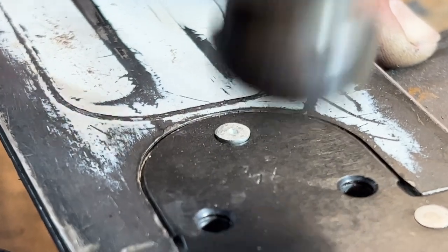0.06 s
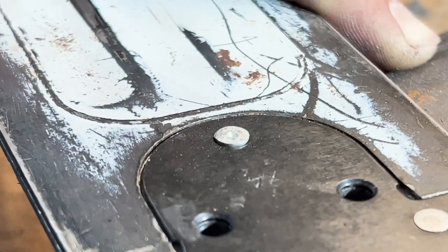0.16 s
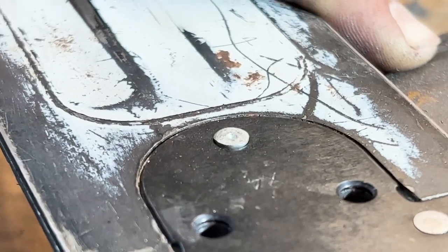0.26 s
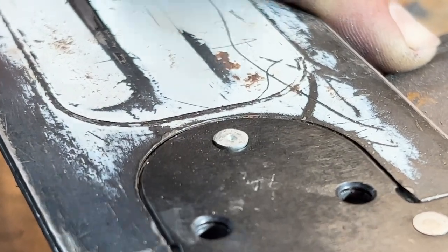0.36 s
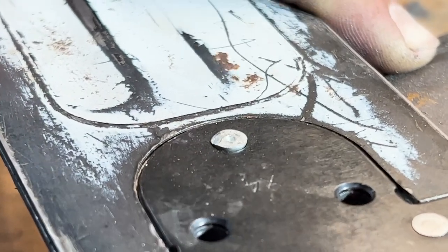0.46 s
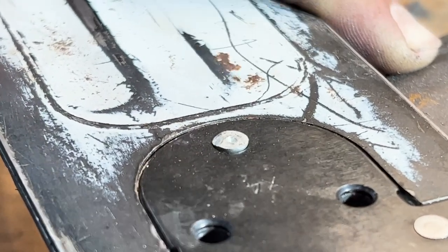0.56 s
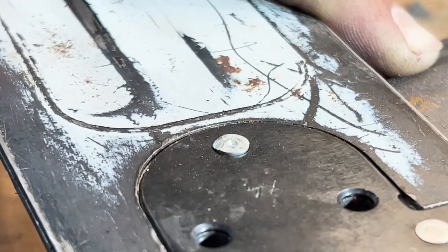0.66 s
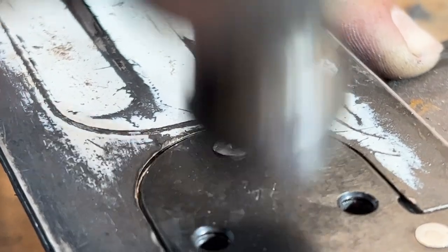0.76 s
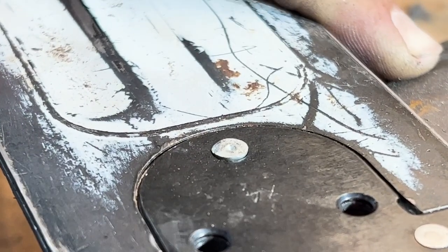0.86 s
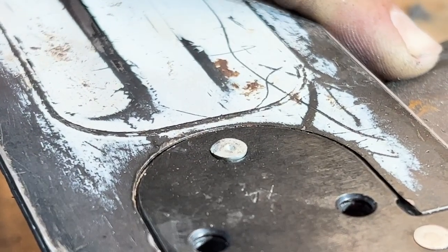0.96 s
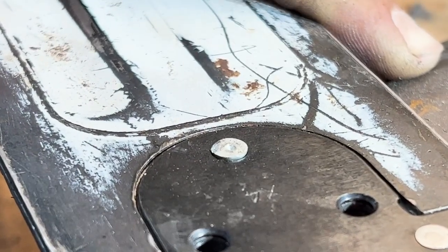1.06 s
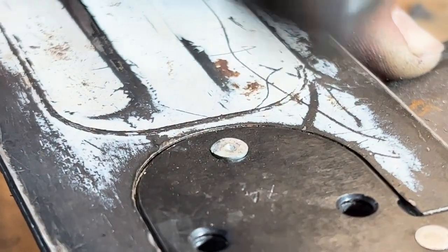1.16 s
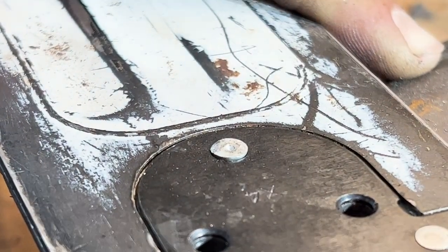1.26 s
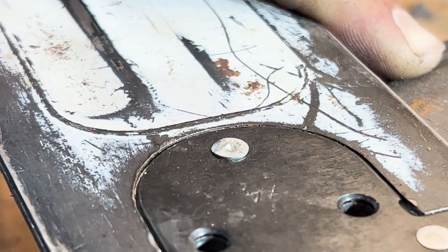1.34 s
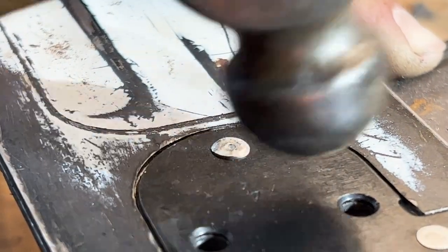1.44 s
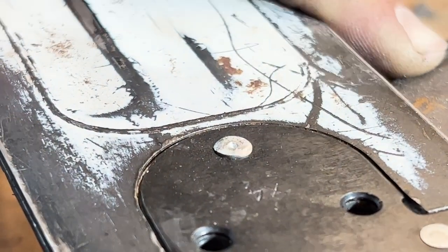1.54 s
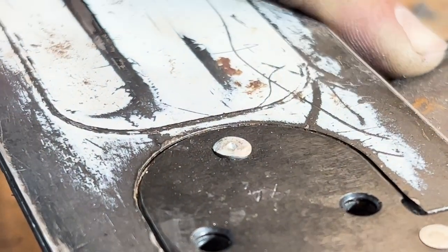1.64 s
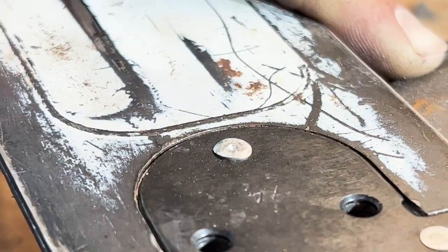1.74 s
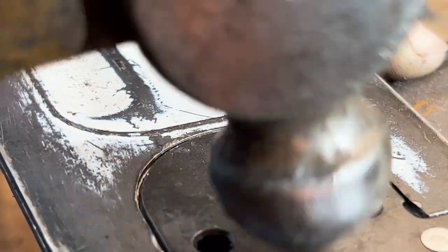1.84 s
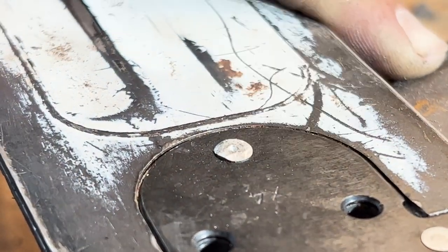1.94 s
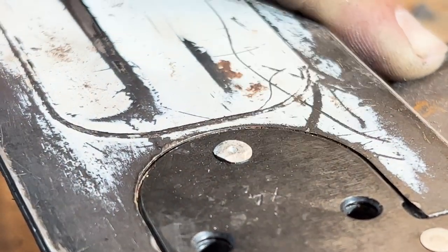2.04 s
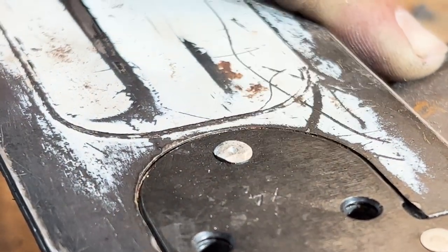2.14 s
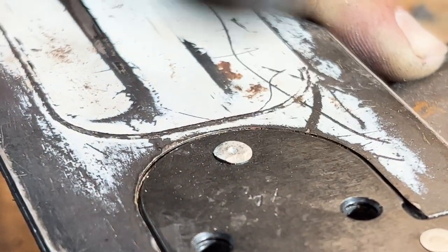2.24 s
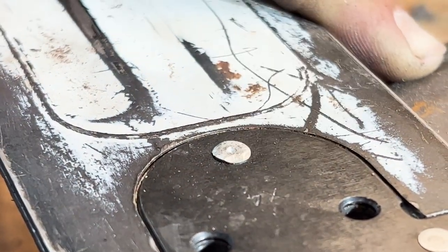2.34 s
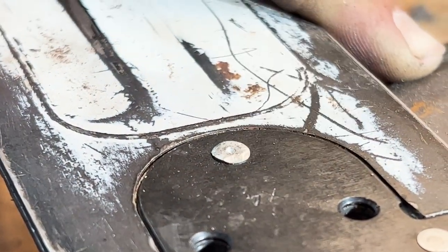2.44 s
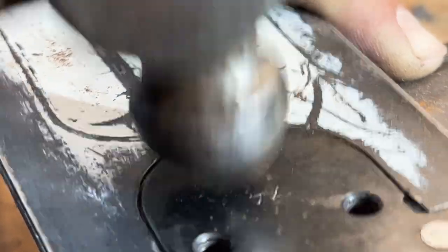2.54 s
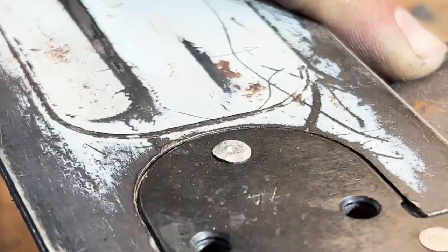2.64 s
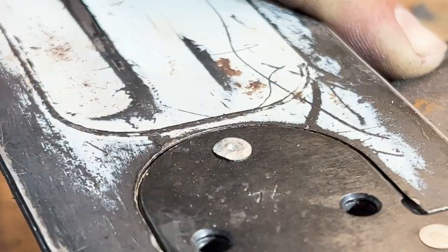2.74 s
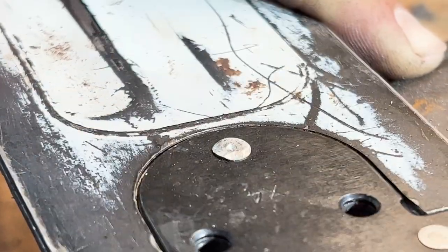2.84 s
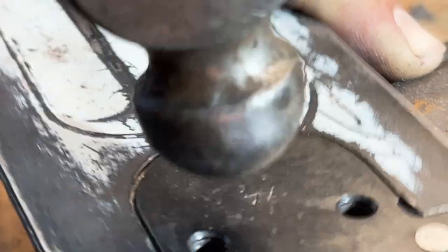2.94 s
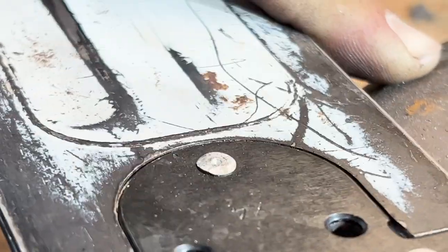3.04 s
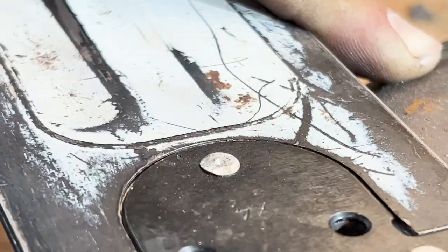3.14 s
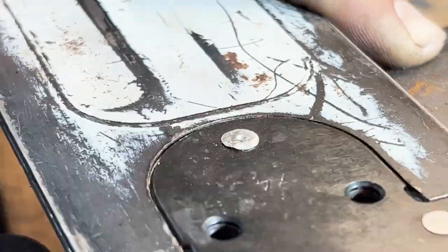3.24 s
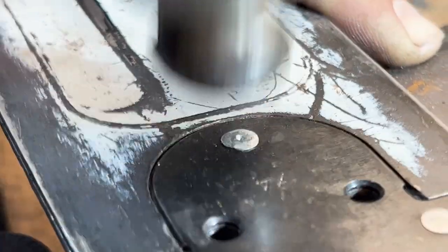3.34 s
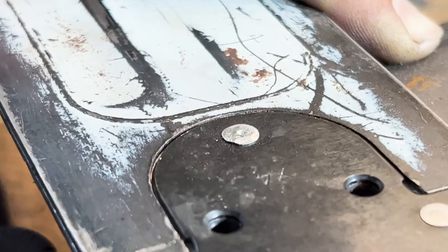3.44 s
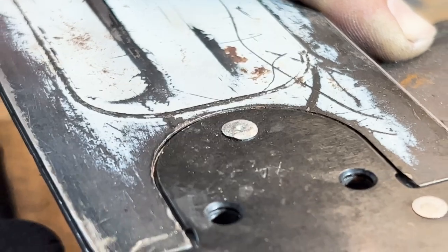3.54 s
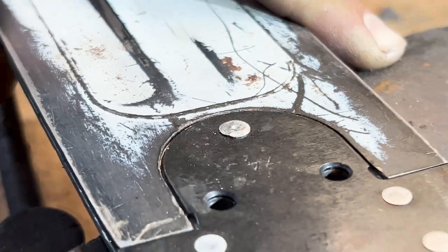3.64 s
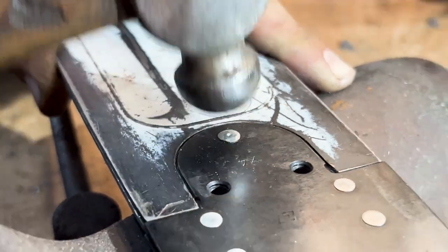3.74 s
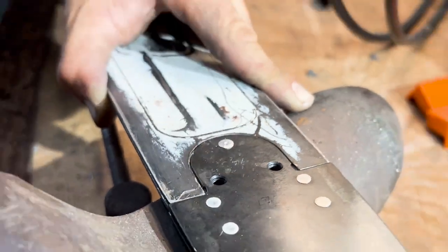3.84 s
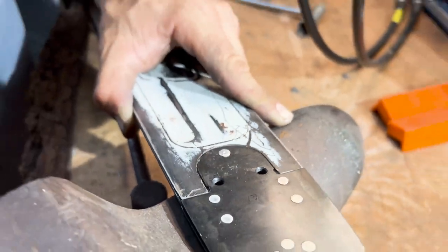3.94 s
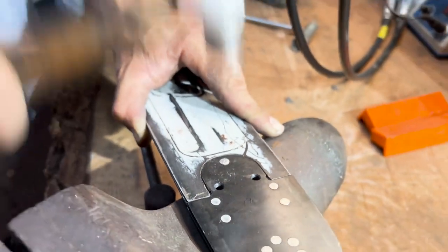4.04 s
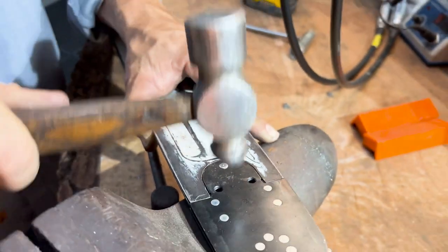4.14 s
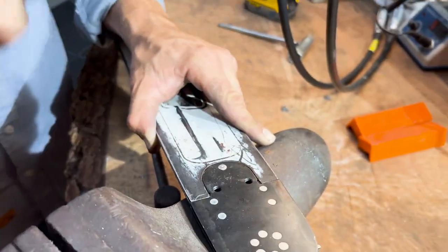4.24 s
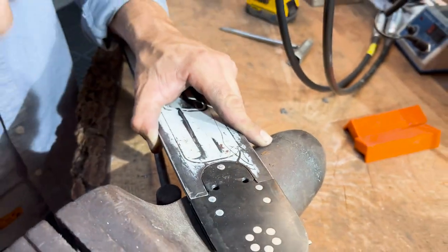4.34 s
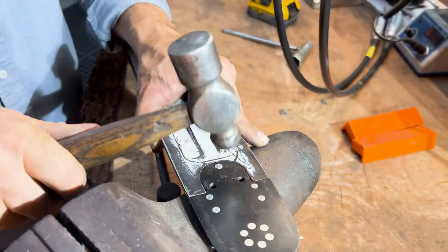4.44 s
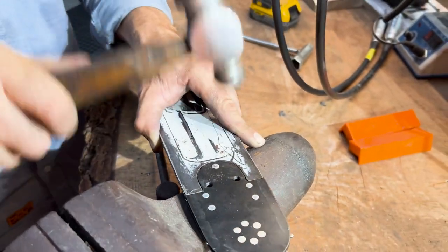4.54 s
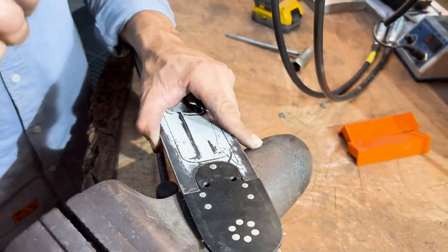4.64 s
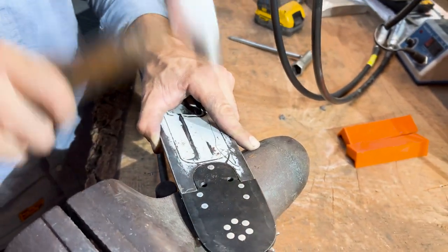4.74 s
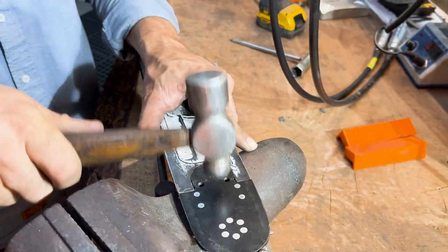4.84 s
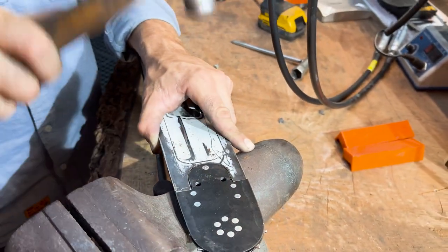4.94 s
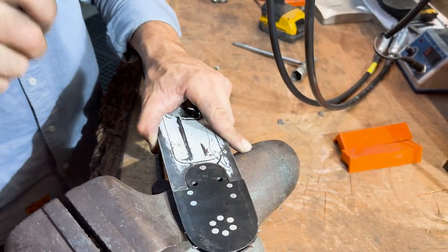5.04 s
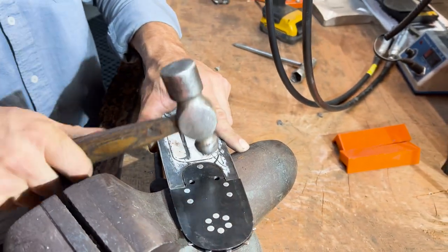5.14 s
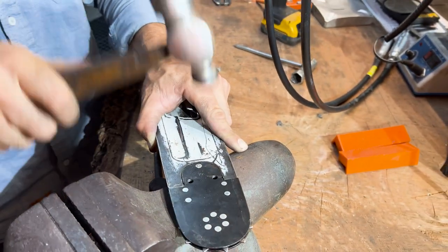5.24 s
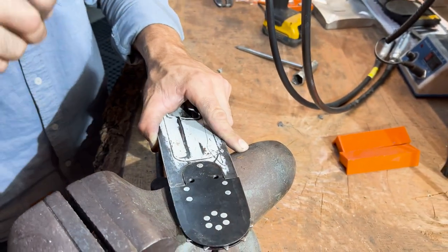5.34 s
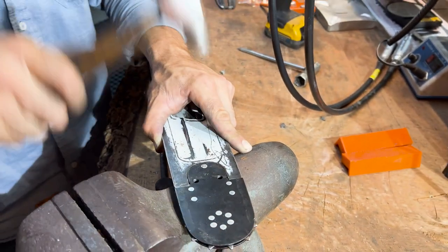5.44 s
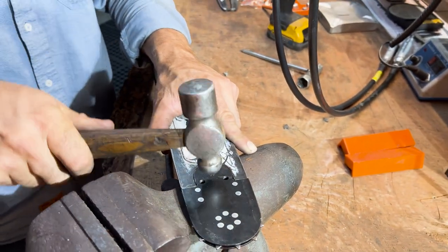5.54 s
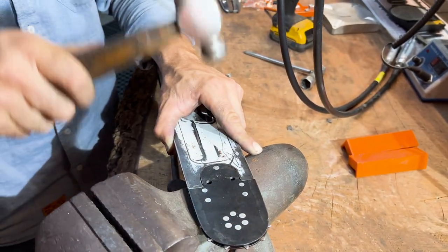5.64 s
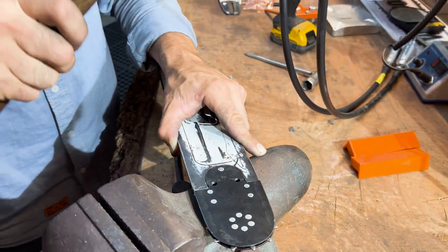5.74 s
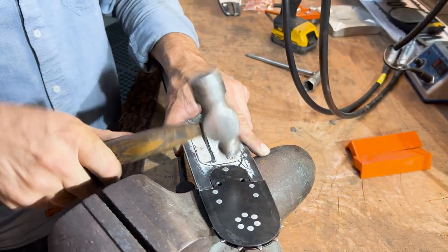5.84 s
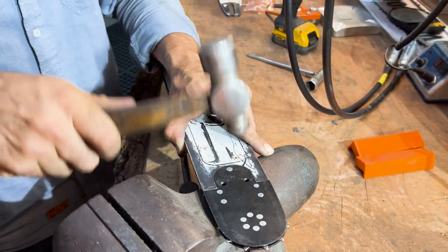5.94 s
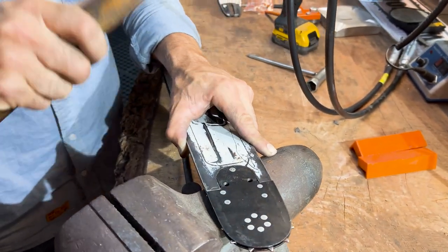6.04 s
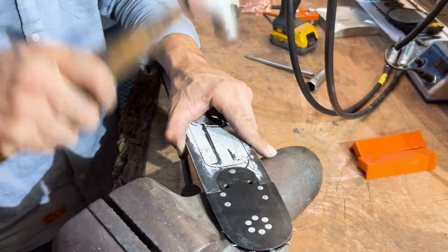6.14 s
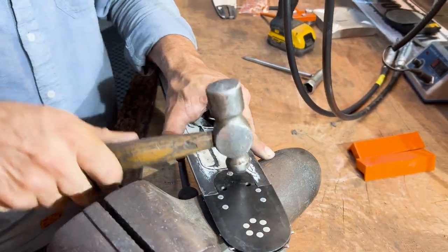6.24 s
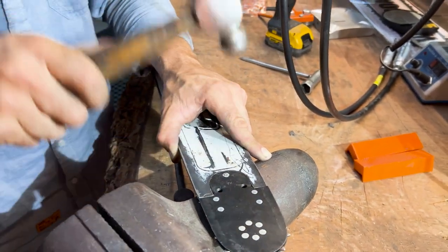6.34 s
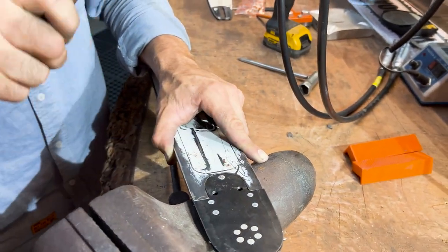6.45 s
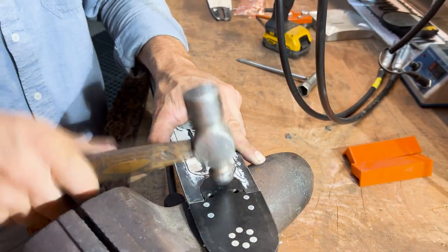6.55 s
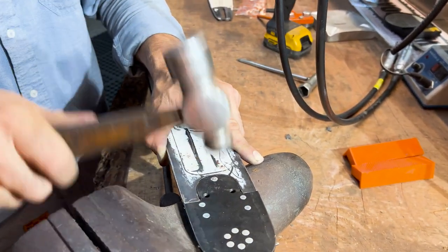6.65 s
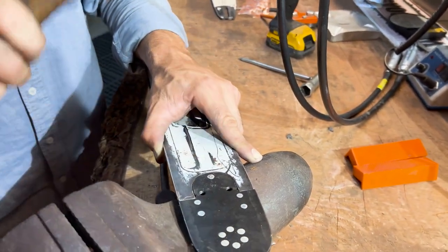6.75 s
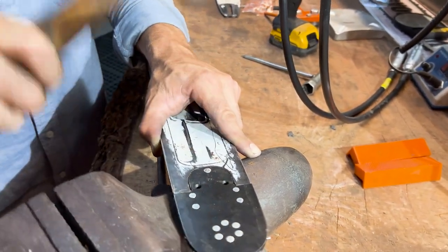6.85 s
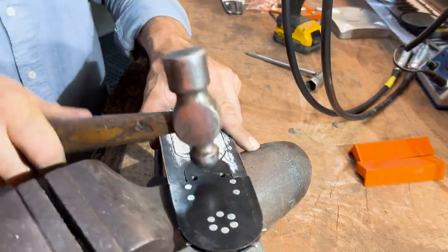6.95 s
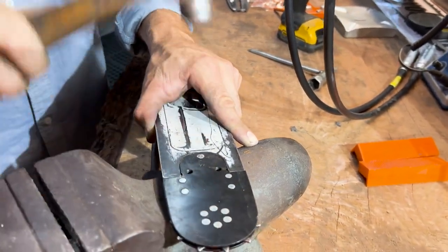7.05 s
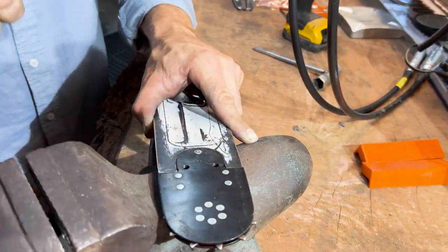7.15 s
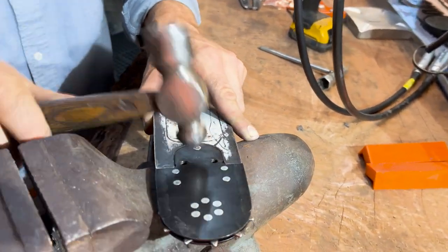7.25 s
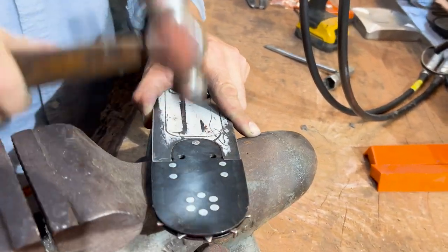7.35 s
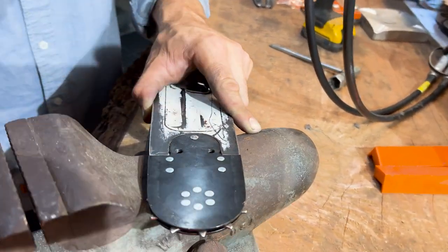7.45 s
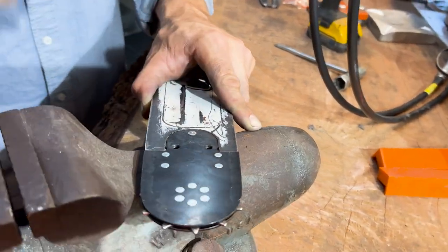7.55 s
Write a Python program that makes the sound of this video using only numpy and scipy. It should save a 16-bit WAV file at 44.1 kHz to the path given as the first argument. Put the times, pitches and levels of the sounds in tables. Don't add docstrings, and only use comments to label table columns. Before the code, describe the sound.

A quiet workshop with faint low air noise. At 0 s the tail of a previous hammer blow is still dying away when a hard, close steel crack lands. Blows follow evenly about every 0.36 s, at roughly 0.4, 0.75, 1.1, 1.5, 1.85 and 2.2 s, slightly slower near 3 s. Each has a gritty, bright attack, a short damped bar ring around 1.4 kHz and a hollow anvil knock near 350 Hz. Up to 3.8 s most are followed 30-45 ms later by a loud slap of the hopping bar, giving a doubled clack, while the bench thuds and sways deeply. From 4 s the microphone is farther away: ten softer blows continue from 4.1 s to 7.28 s, with fewer slaps, some looser chatter, more knock and a more noticeable short, coloured room tail. The last one fades into quiet air.

```python
import sys
import numpy as np
from scipy import signal
from scipy.fft import rfft, irfft, next_fast_len
from scipy.io import wavfile
from scipy.ndimage import uniform_filter1d

SR = 44100
rng = np.random.default_rng(int(sys.argv[2]) if len(sys.argv) > 2 else 0)


def put_to_file(sound):
    columns = np.atleast_2d(sound).T
    safe = np.clip(columns, -1, 1)
    whole_steps = np.round(safe * 32767)
    wavfile.write(sys.argv[1], SR, whole_steps.astype(np.int16))


def gain_from_decibels(decibels):
    exponent = np.asarray(decibels, float) / 20
    return 10 ** exponent


N = 334719
STEP_BACK_S = 4.0

# (frequency [Hz], density [dB per Hz])
AIR = [(40, -3.5), (100, -6), (350, 3.5), (1000, 6.5), (3000, -20), (7000, -23), (10000, -50),
       (16000, -100)]
# (time [s], room tail [dB], lasting bar ring [dB], lasting anvil knock [dB])
EARLIER_BLOW = (-0.54, 13.5, 17, 8.5)
# (room tail [dB], lasting bar ring [dB], lasting anvil knock [dB], flex [dB])
BAR_LIE = [(-16.5, 2.5, 11, -8), (-17, 12, 9.5, 0.6), (-17, 1, 10, -2), (-18, 0, 10, -12.5),
           (-20.5, 5.5, -1.1, -1.5), (-21, 4, 12, -4.5), (-17, 3, 11.5, -5.5), (-19.5, 14.5, 11.5, -14),
           (-21.5, 8, 5.5, 0), (-19.5, 8, 10, -8.5), (-17.5, 14, 6.5, -8), (-15, -2.5, 15.5, -2.5),
           (-12.5, -7, 13, -0.5), (-13.5, -4, 13, -1.5), (-13.5, 12.5, 12.5, -1), (-13, 0, 11.5, -7),
           (-13, -18, 11, -5.5), (-16, -2.5, 12, -0.5), (-15, -16, 12.5, -10), (-13, 3.5, 13.5, 2.5),
           (-13, -1, -30, -1.5)]
# (frequency [Hz], t60 [s])
WALLS = [(60, 0.81), (100, 0.58), (200, 0.68), (350, 0.64), (1000, 0.81), (2500, 0.81), (6400, 0.58),
         (9000, 0.66), (13000, 0.43)]
# (frequency [Hz], width [Hz], level [dB])
BAR_ECHO = [(1100, 80, -8), (1433, 72, 1.5), (1498, 36, 7.5), (1770, 98, 1), (2360, 340, -9),
            (2950, 240, -9)]
# (frequency [Hz], width [Hz], level [dB])
ANVIL_ECHO = [(96, 7.8, 2.5), (220, 29, -14), (355.3, 22.7, 0.5)]
# (frequency [Hz], width [Hz], level [dB])
HEAD = [(1860, 89, -5.5), (2170, 43, -6.5), (3160, 110, -4.5), (4760, 210, 0), (5900, 110, 1),
        (6590, 320, -5.5)]
# (frequency [Hz], level [dB])
ECHO_CLOSE = [(100, 1.5), (250, 4), (500, 7.5), (1000, 9.5), (1500, -0.5), (3000, 1), (5000, -2), (8000, 1),
              (14000, -7.5)]
# (frequency [Hz], level [dB])
ECHO_WIDE = [(100, -9.5), (250, -7.5), (500, -2.5), (1000, 2.5), (1500, -5), (3000, -7), (4800, -7.5),
             (5600, -10.5), (6800, -4), (7500, -16.5), (8000, -8), (14000, -17)]
# (time [s], peak level [dB], final pitch [Hz])
JOLTS = [(0.033, -30.5, 55), (0.083, -41, 57.3), (0.405, -34, 121), (0.44, -28, 64.9), (0.764, -30.5, 78),
         (0.811, -37, 68.4), (1.126, -39, 79), (1.17, -36, 96), (1.476, -48, 96), (1.505, -45.5, 76),
         (1.838, -49.5, 94.6), (1.871, -48.5, 86.5), (2.2, -28.5, 67), (2.237, -47, 84), (2.572, -48, 95),
         (2.967, -38, 71), (3.379, -40, 79.6), (3.423, -31, 90.5), (3.729, -31, 100.2), (3.768, -37, 67.1),
         (4.104, -42.5, 75.7), (4.463, -35.5, 68.5), (4.812, -45, 72.5), (5.161, -47, 95),
         (5.516, -39.5, 79.5), (5.876, -39.5, 78), (6.22, -44.5, 89), (6.584, -44.5, 80.5),
         (6.93, -43, 113), (7.278, -32, 58)]
# (time of loudest point [s], level [dB], length [s])
SWELLS = [(0.143, -57, 0.13), (0.597, -56.5, 0.25), (0.88, -63, 0.12), (1.248, -76, .2), (1.592, -84.5, .15),
          (2.312, -73, 0.14), (3.076, -76.5, 0.14), (3.47, -66, 0.36), (3.838, -67, 0.5), (4.218, -81, .2),
          (5.36, -72.5, 0.3), (5.635, -76, 0.22), (6.423, -72.5, .18), (7.14, -80, 0.15),
          (7.428, -65.5, 0.29)]
# (time [s], peak level [dB], bar ring [dB], anvil knock [dB], chatter [dB])
BLOWS = [(0.0342, -16, -15.5, -14.5, -7), (0.407, -15, -11, -24, -3), (0.7643, -15, -12, -18.5, -1.5),
         (1.126, -15, -16.5, -16.5, -9), (1.475, -14, -16, -16.5, -12), (1.8381, -16.5, -16.5, -19.5, -11),
         (2.1954, -14, -11, -17.5, -14), (2.5661, -17, -14, -46, -18), (2.9639, -16.5, -13, -50, 5.5),
         (3.378, -14.5, -15.5, -23.5, -4.5), (3.727, -19.5, -11, -19, 14), (4.0999, -23.5, -21, -12.5, 19),
         (4.459, -24.5, -22.5, -13.5, -4), (4.808, -21, -30, -14, -5), (5.1613, -22, -10, -16.5, -10.5),
         (5.5136, -26, -25, -16, 0), (5.8737, -24, -27, -13.5, 5), (6.2213, -23, -16, -20, -1),
         (6.583, -24, -20, -18.5, 11), (6.9281, -24, -12, -14.5, 10), (7.2776, -22.5, -12.5, -11.5, -0.5)]
SEAT_HZ = [334, 395, 348, 337, 452, 320, 337.6, 328, 382, 348.4, 425, 340, 345, 357, 348, 354, 347, 305,
           343, 368, 354]
# (time [s], peak
# level [dB], bar ring [dB], anvil knock [dB], clatter t60 [s])
SLAPS = [(0.0384, -29.5, -17, -6.5, 0.079), (0.0813, -15.5, -16.5, -25.5, 0.036),
         (0.4399, -17.5, -12.5, -36.5, 0.044), (0.809, -15, -20.5, -36, 0.037),
         (1.1706, -15, -14, -29, 0.027), (1.5011, -14.5, -16.5, -20, 0.034),
         (1.5113, -21, -10.5, -24.5, 0.04), (1.5249, -24.5, -21.5, -22, 0.02),
         (1.8658, -16, -13, -33, 0.071), (2.2358, -15.5, -15.5, -28.5, 0.047),
         (2.5747, -17.5, -15, -28, 0.043), (2.5832, -17.5, -22, -29, 0.055),
         (2.589, -15, -11.5, -36, 0.032), (2.9822, -24.5, -13.5, -21, 0.047),
         (3.0191, -33.5, -23, -31, 0.035), (3.4184, -18.5, -13, -31, 0.031), (3.765, -17, -11, -26, 0.025),
         (4.5121, -30.5, -13, -19, 0.041), (5.1775, -30.5, -24, -20, 0.019), (5.202, -37, -25, -24, 0.021),
         (6.257, -27.5, -16.5, -33.5, 0.038)]
# (frequency [Hz], width [Hz], level [dB])
STEEL = [(2135, 120, -9), (2854, 170, 6), (3466, 110, -2), (4680, 330, 4.5), (6240, 420, -5),
         (6710, 680, 4.5)]
# (frequency [Hz], width [Hz], level [dB])
BAR = [(1376.4, 113, -6), (1477, 268, -4.5), (1082, 194, -13)]
# (frequency [Hz], width [Hz], level [dB])
FLEX = [(750, 940, -5.5), (1033, 139, 8.5)]
# (frequency [Hz], density [dB per Hz])
CLOSE_COLOUR = [
    [(88, -38), (150, -5), (349, -4.5), (451, -9), (864, -10), (1250, -11.5), (1440, -8.5), (1860, -11.5), (7370, -13), (10100, -26.5), (11400, -17.5), (13800, -13), (16500, -27)],
    [(88, -36), (150, -9.5), (1410, -6), (2220, -21), (3420, -9.5), (5930, -14), (6810, -19.5), (10300, -1.5), (13300, -13.5), (15600, -6), (16500, -16.5)],
]
# (frequency [Hz], density [dB per Hz])
WIDE_COLOUR = [
    [(88, -42), (150, 3.5), (293, -3.5), (349, -4), (560, -11), (1120, -7), (1230, -12.5), (1410, -6), (1650, -8.5), (7080, -8.5), (10500, -20), (13600, -9.5), (16500, -26)],
    [(88, -39), (150, -11), (1250, -6), (1470, -2), (2310, -5), (3490, -3), (7660, -8), (10900, -10), (13300, -13), (15300, -34), (16500, -29)],
]
# (frequency [Hz], left minus right [dB])
LEAN = [
    [(60, -10), (110, 4), (200, -1.5), (380, 0.5), (700, 0.5), (1290, 2), (2380, -0.5), (4400, 0), (8120, 0), (15000, 0.5)],
    [(60, -1), (110, 1), (200, 0.5), (380, 1.5), (700, 0.5), (1290, 2.5), (2380, -1.5), (4400, 1.5), (8120, 4), (15000, -2.5)],
]

SLAP_KNOCK_HZ = 354.8


def unit(x):
    return x / np.sqrt(np.mean(x ** 2) + 1e-20)


def peak_one(x):
    return x / np.sqrt(uniform_filter1d(x ** 2, SR // 250).max())


def along(points, hz):
    f, v = np.transpose(points)
    return np.interp(np.log(hz + 1), np.log(f + 1), v)


def filtered(x, response):
    n = x.shape[-1]
    m = next_fast_len(n + SR // 10)
    return irfft(rfft(x, m) * response(np.fft.rfftfreq(m, 1 / SR)), m)[..., :n]


def modes(table):
    def response(f):
        total = 0
        for k, (centre, width, db) in enumerate(table):
            drag = 1j * f * width
            total = total + (-1) ** k * gain_from_decibels(db) * drag / (centre * centre - f * f + drag)
        return total
    return response


def quiet_air():
    noise = rng.standard_normal((2, N))
    return gain_from_decibels(-74.5) * unit(filtered(noise, lambda hz: gain_from_decibels(along(AIR, hz)) * (hz > 35)))


def workshop():
    out = np.zeros((2, N + 2 * SR))
    window = dict(nperseg=2048, noverlap=1536)
    answers = [(blow[0], *lie[:3]) for blow, lie in zip(BLOWS, BAR_LIE)]
    for s, db, ring_db, knock_db in [EARLIER_BLOW, *answers]:
        hz, t, z = signal.stft(rng.standard_normal((2, SR // 2)), SR, **window)
        lines = modes([(c, w, level + rng.normal(0, 4)) for c, w, level in HEAD])(hz)
        ring = gain_from_decibels(ring_db) * modes(BAR_ECHO)(hz)
        knock = gain_from_decibels(knock_db) * modes(ANVIL_ECHO)(hz)
        colour = np.sqrt(1 + abs(ring) ** 2 + abs(knock) ** 2 + abs(gain_from_decibels(3.0) * lines) ** 2)
        bright_db = -0.94 + 0.15 * max(ring_db, 0)
        room_db = along(ECHO_CLOSE if s < STEP_BACK_S else ECHO_WIDE, hz)
        colour = colour * gain_from_decibels(room_db + bright_db * np.log2(hz / 1500 + .25))
        decay = gain_from_decibels(-60 * t / along(WALLS, hz)[:, None])
        tail = signal.istft(z * colour[:, None] * decay, SR, **window)[1]
        rise = 1 - np.exp(-np.arange(tail.shape[1]) / SR / 0.0034)
        out[:, SR + round(s * SR):][:, :tail.shape[1]] += gain_from_decibels(db - 20.5) * rise * tail
    return out[:, SR:][:, :N]


def lead_in_tones():
    out, t = np.zeros((2, N + SR)), np.arange(SR // 40) / SR
    swell = np.sin(np.pi / 2 * t / t[-1]) ** 3.4
    for s, peak_db, _, knock_db, _ in BLOWS:
        count, db = (14, -44.5) if s < STEP_BACK_S else (60, -41.5)
        hz = rng.uniform(250, 8200, (count, 1))
        turn = rng.random((2, count, 1))
        size_db = rng.normal(0, 4.0, (count, 1))
        tones = gain_from_decibels(size_db) * np.sin(2 * np.pi * (hz * t + 1.1 * turn + turn[0]))
        knock = np.sin(2 * np.pi * SLAP_KNOCK_HZ * t) * swell ** 1.6
        spot = out[:, round(s * SR) + 100:][:, :len(t)]
        spot += gain_from_decibels(db - 4.5) * unit(tones.sum(axis=1)) * swell
        spot += gain_from_decibels(peak_db + knock_db - 15.5) * knock
    return out[:, len(t):][:, :N]


def bench_jolts():
    out, t = np.zeros(N + SR), np.arange(SR // 4) / SR
    for s, db, hz in JOLTS:
        peak_s = .014 * gain_from_decibels(-0.14 * (db + 38.5))
        phase = 2 * np.pi * (hz * t + 2.6 * (1 - np.exp(-t / 0.0046)) + rng.random())
        rise = np.sin(np.pi / 2 * t / peak_s) ** 2
        fall = gain_from_decibels(-60 * (t - peak_s) / 0.093)
        out[round(s * SR):][:len(t)] += gain_from_decibels(db) * np.where(t < peak_s, rise, fall) * np.sin(phase)
    return out[:N]


def low_swells():
    out = np.zeros(N + SR)
    sway_hz, sag_hz_per_s = 49.4, 30
    for s, db, length in SWELLS:
        u = np.arange(-length / 2, length / 2, 1 / SR)
        swing = np.cos(np.pi * u / length) ** 2 * np.sin(2 * np.pi * (sway_hz - sag_hz_per_s * u / 2) * u)
        out[round((s - length / 2) * SR):][:len(u)] += gain_from_decibels(db + 6.5) * swing
    return out[:N]


def steel_contact(t, ring_db, knock_db, t60, chatter_db, flex_db, knock_hz):
    grit_db = 3.8 * rng.standard_normal(len(t) // 40 + 1).repeat(40)[:len(t)]
    grit = rng.standard_normal(len(t)) * gain_from_decibels(grit_db)
    clatter = gain_from_decibels(-60 * np.maximum(t - .003, 0) / np.clip(t60, .005, .3))
    chatter = gain_from_decibels(chatter_db - 60 * t / 0.14)
    tick = 1 + 1.5 * gain_from_decibels(-60 * t / .006)
    burst = grit * (clatter + chatter) * tick * (1 - np.exp(-t / .00025))
    crack = peak_one(burst + gain_from_decibels(2) * filtered(burst, modes(STEEL)))
    ring = gain_from_decibels(ring_db + 6) * peak_one(filtered(burst, modes(BAR)))
    knock_swell = gain_from_decibels(-60 * t / 0.096) * (1 - np.exp(-t / 0.0048))
    knock = gain_from_decibels(knock_db - 3.0) * peak_one(np.sin(2 * np.pi * knock_hz * t) * knock_swell)
    flex = gain_from_decibels(flex_db - 9.5) * peak_one(filtered(burst, modes(FLEX)))
    return crack + ring + knock + flex


def hammer_and_bar():
    out, t = np.zeros(N + SR), np.arange(SR // 8) / SR
    blows = [(*row[:4], .013, row[4], lie[3], hz) for row, lie, hz in zip(BLOWS, BAR_LIE, SEAT_HZ)]
    slaps = [(*row, -20.5, -8.5, SLAP_KNOCK_HZ) for row in SLAPS]
    for s, db, *how in sorted(blows + slaps):
        out[round(s * SR):][:len(t)] += gain_from_decibels(db + 1.0) * steel_contact(t, *how)

    def radiation(f):
        r = f / 210
        no_bass = (-r ** 2 / (1 + 1.4j * r - r ** 2)) ** 2
        late_lows = np.exp(-1j * 0.6055 * (np.sqrt(f) - f / 260))
        return no_bass * late_lows
    return filtered(out[:N], radiation)


def ports(mid, side, colour, side_db, lean):
    def smooth(table):
        return lambda hz: gain_from_decibels(along(table, np.maximum(hz, 200))) / (1 + (38 / (hz + 1)) ** 4)
    mid = filtered(mid, smooth(colour[0]))
    side = gain_from_decibels(side_db) * filtered(side, smooth(colour[1]))
    halves = np.array([[.5], [-.5]])
    return filtered(np.array([mid + side, mid - side]), lambda hz: gain_from_decibels(along(lean, hz) * halves))


def scene():
    direct, wet = hammer_and_bar(), workshop()
    lagged = filtered(direct, lambda hz: 1j * (hz > 0))
    mid, side = direct + wet[0], lagged + gain_from_decibels(-0.5) * wet[1]
    close = gain_from_decibels(4) * ports(mid, side, CLOSE_COLOUR, -10.5, LEAN[0])
    wide = gain_from_decibels(5.0) * ports(mid, side, WIDE_COLOUR, -3, LEAN[1])
    view = np.where(np.arange(N) < STEP_BACK_S * SR, close, wide)
    ears = np.array([[1], [-1]])
    rumble = filtered(bench_jolts() + low_swells(), lambda hz: np.exp(.3j * ears))
    return view + rumble + quiet_air()


def low_pass(x):
    return signal.sosfilt(signal.butter(12, 16990, fs=SR, output="sos"), x)


def record(dry):
    held = dry / (1 + abs(dry / .2) ** 4) ** (1 / 4)
    held = filtered(held + lead_in_tones(), lambda hz: 1 / (1 + (hz / 16300) ** 140))
    return low_pass(held)


dry = scene()
out = record(dry)
put_to_file(out)
```